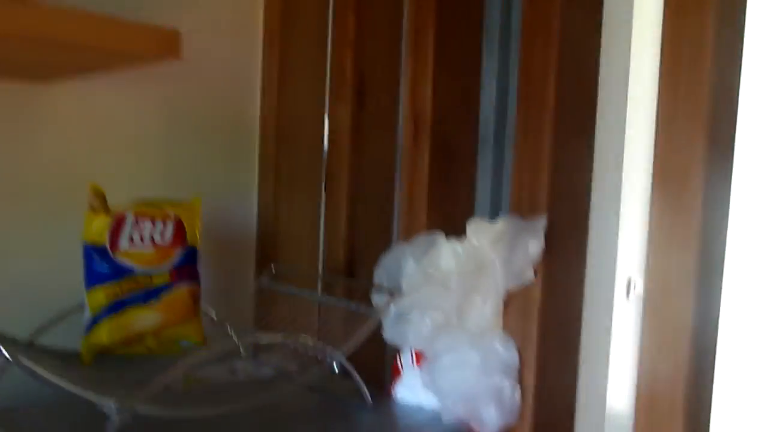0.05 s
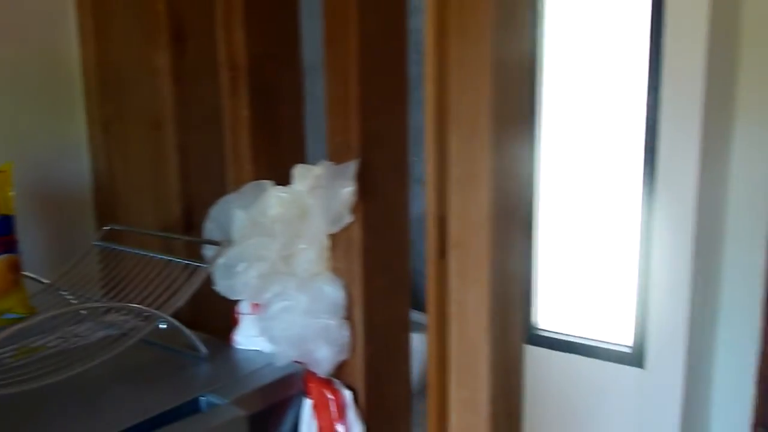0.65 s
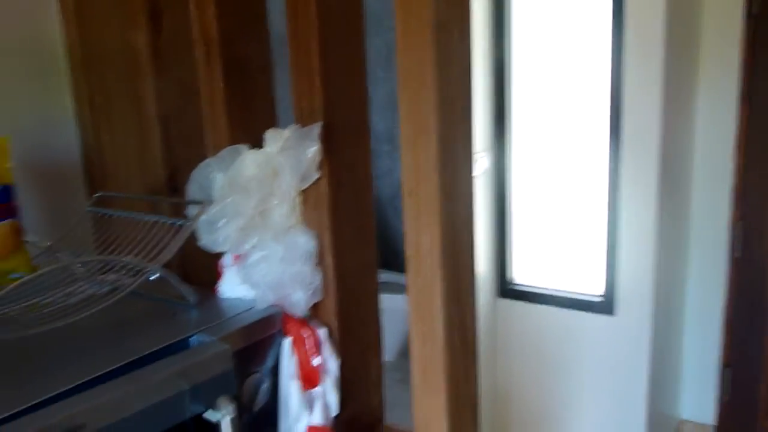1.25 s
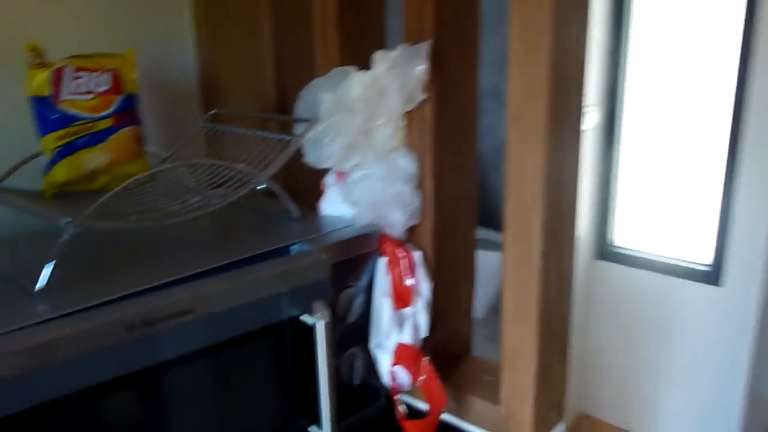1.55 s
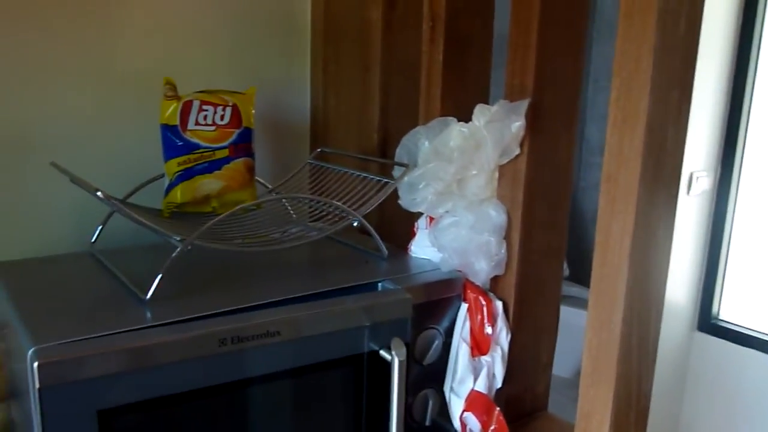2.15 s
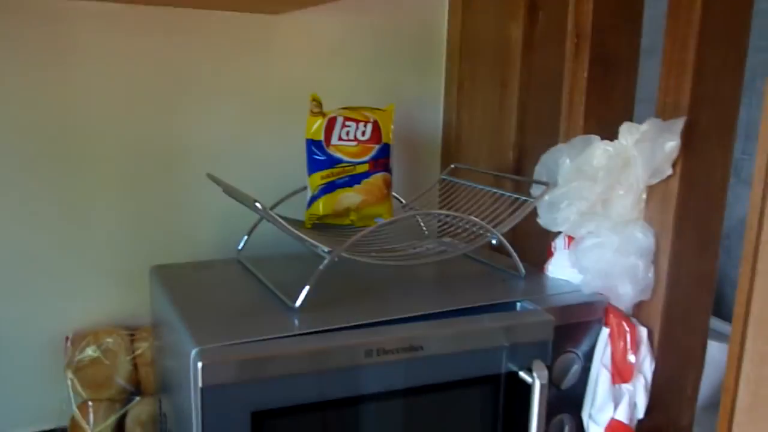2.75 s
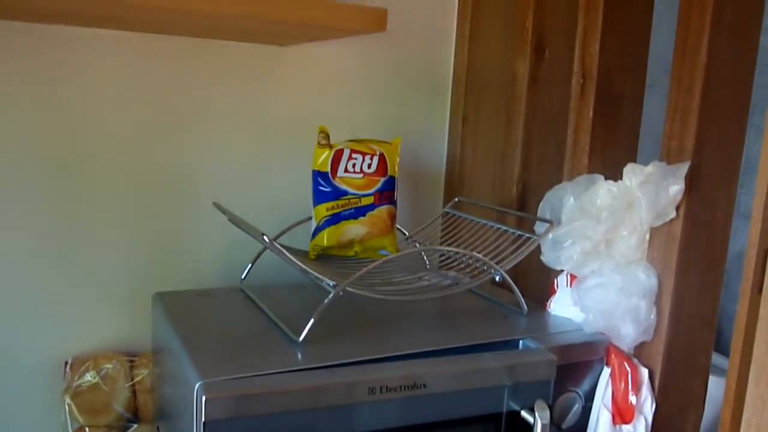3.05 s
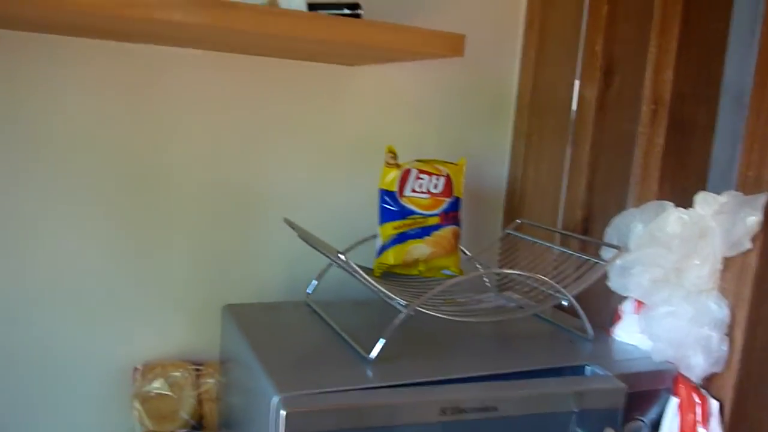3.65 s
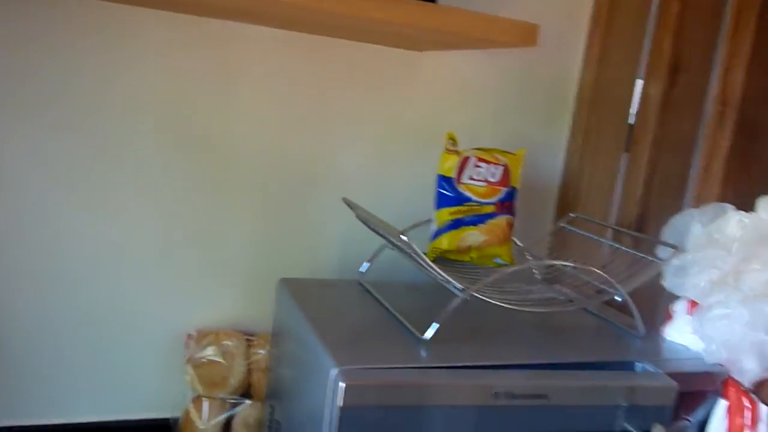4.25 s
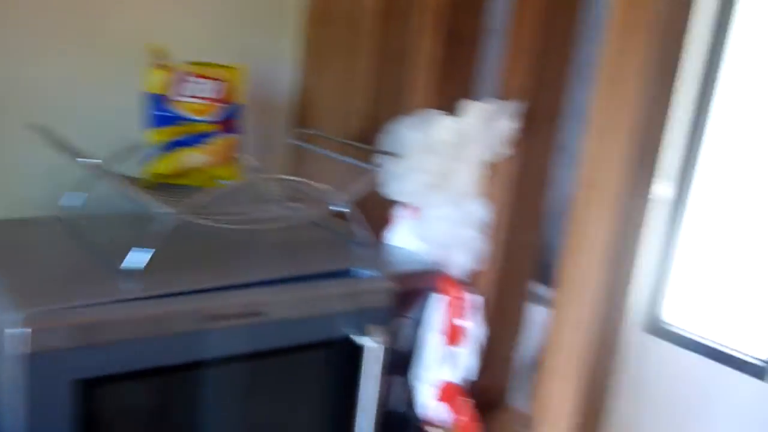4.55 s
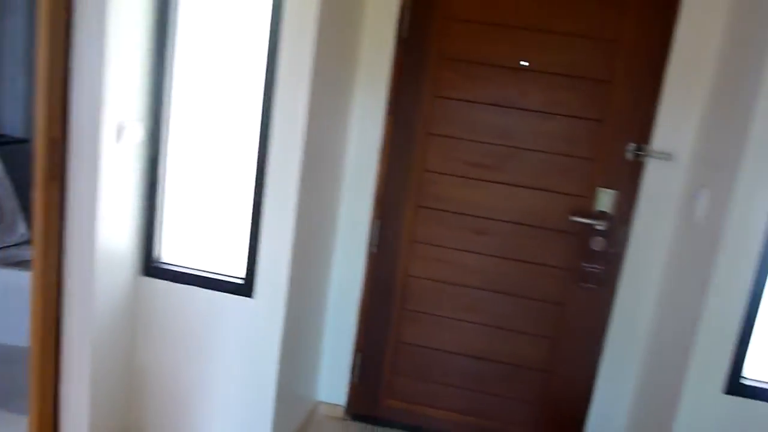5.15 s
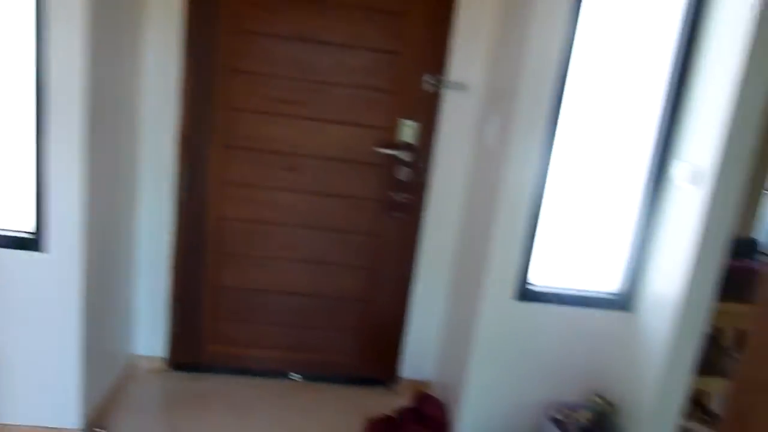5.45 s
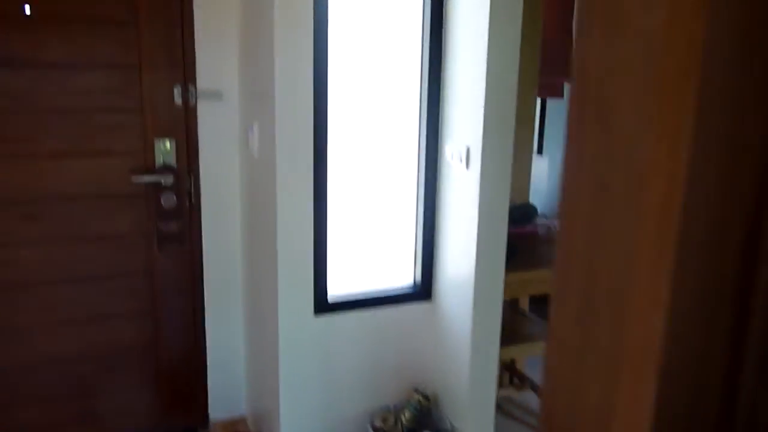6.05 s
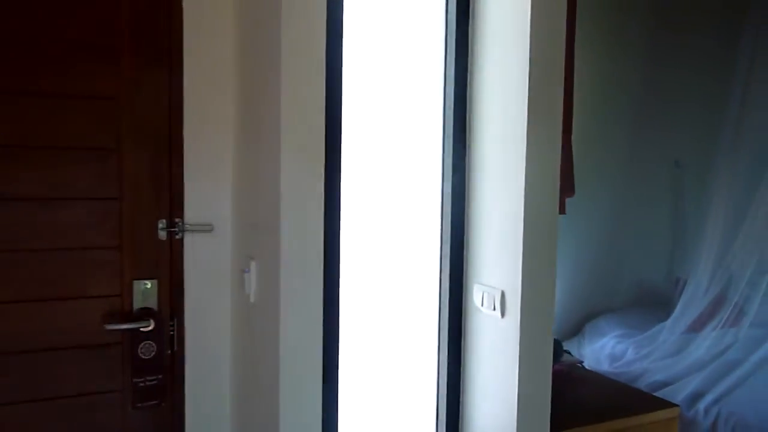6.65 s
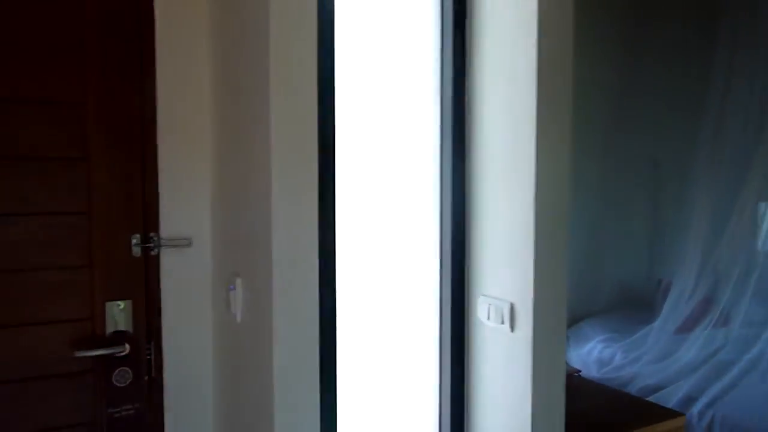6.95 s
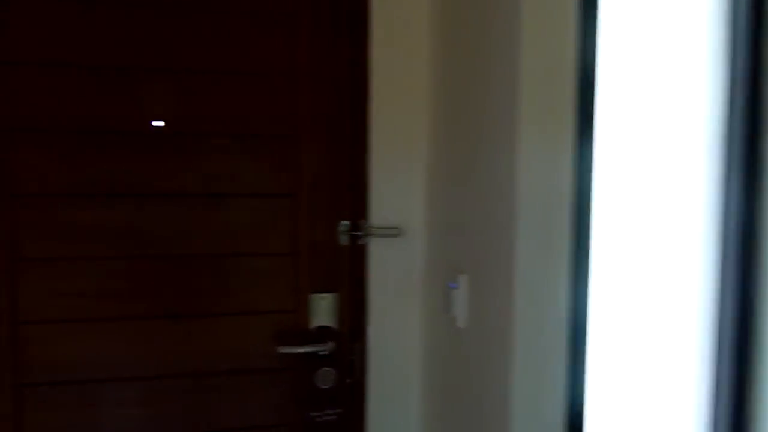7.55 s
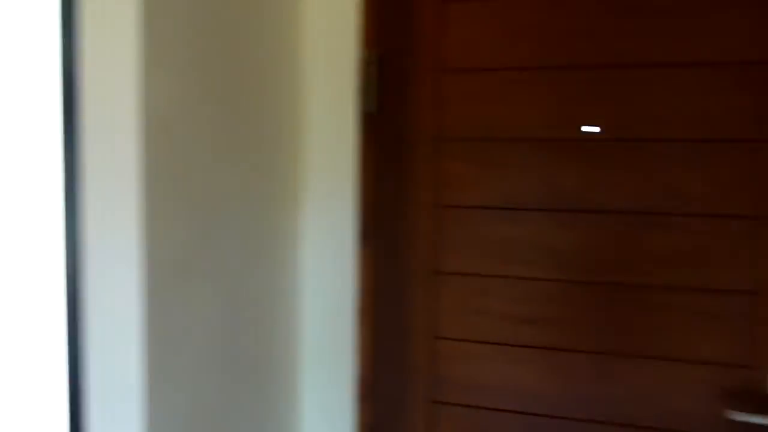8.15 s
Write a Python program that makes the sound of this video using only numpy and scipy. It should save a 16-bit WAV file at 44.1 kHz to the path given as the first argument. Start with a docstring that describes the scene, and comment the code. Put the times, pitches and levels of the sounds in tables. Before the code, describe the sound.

In a small room, a sliding door bangs shut and rattles, then come soft steps, one sharp click, shoe scuffs and clothing rustle.

```python
"""In a small hard room, a sliding door rumbles along its track, slams, booms, rattles and is knocked
into place. Soft footfalls and a sharp, ringing snap follow. Clothes rustle and soles scuff the floor
as a handheld camera is carried round, its casing ticking under the fingers.
A bird chirps faintly outside, heard mostly as an echo off the walls."""
import sys
import numpy as np
from scipy import signal
from scipy.fft import rfft, irfft, next_fast_len
from scipy.io import wavfile

SR = 44100
rng = np.random.default_rng(int(sys.argv[2]) if len(sys.argv) > 2 else 0)


def inscribe(sig):
    """Save sig as 16-bit PCM at rate SR to the path in sys.argv[1].

    A 1-D sig is mono; a 2-D sig holds one channel per row.
    Samples are clipped to [-1, 1] before scaling.
    """
    pcm = np.round(np.clip(np.atleast_2d(sig).T, -1, 1) * 32767)
    wavfile.write(sys.argv[1], SR, pcm.astype(np.int16))


N = 366382
T = np.arange(N) / SR
HIT_T = T[:32768]  # the time axis of one hit [s]


def door():
    """The door rolls shut, slams and booms, and its latch catches."""
    return slam() + latch() + rollers() + panel()


def slam():
    """Blows make the door ring and the room boom, and shake the loose frame."""
    # blows on the door (time [s], level [dB], treble [dB], bass [dB], room echo [dB])
    blows = [(.66, -37.5, -4, 6, -3.5), (.6775, -15, -6.5, -1.5, -5.5), (.686, -23.5, 8, -2, -9),
             (.699, -13, -1, -5, -19), (.711, -13, 5, -3.5, -1), (.727, -21, 3.5, -5.5, -2),
             (1.023, -19, -2, -6.5, -3), (1.099, -39, -2, 15, -27), (1.48, -42.5, 0, 5, -5),
             (1.543, -34, 10, 1, -1.5), (1.651, -29, -10, -7, -1)]
    # tone of a blow (frequency [Hz], level [dB])
    tone = [(25, -14), (70, 9), (135, -10.5), (220, 3), (430, 1), (750, -4.5), (1150, -7.5), (1500, -8),
            (2200, -22), (3600, -24), (8000, -27.5), (14000, -32)]
    # notes the door and the room ring with, the deepest being the room's boom
    # (frequency [Hz], level [dB], fade time [s])
    notes = [(70.6, -4.5, 1), (141.8, -2.5, 0.52), (199.8, 0.5, 0.35), (248.4, -1, 0.44), (280, 1, 0.49),
             (297.5, 10, 0.34), (362, -3.5, .4), (438, 2, 0.37), (488, -6.5, .4), (647, -1, 0.29),
             (771, 2, 0.27), (986, -7, 0.2), (1115, -8, 0.31), (1346, 1, .33), (1500, -12, .32),
             (1595, -15.5, .32)]
    return hits(blows + rattle(), tone, chatter_s=.088, push_db=-9,
                notes=notes, ring_db=-4, lag_s=.005, share=.21)


def rattle(start_s=.745, gap_s=.024, first_db=-25.5, fall_db_per_s=47, scatter_db=3):
    """Rows for hits(): the loose frame taps unevenly after the slam, growing weaker."""
    # tone of every tap (treble [dB], bass [dB], room echo [dB])
    tone = (-7.5, -7.5, -3.5)
    timing, strength = rng.standard_normal((10, 2)).T
    after_s = gap_s * (np.arange(10) + .25 * timing)
    levels = first_db - fall_db_per_s * after_s + scatter_db * strength
    return [(start_s + s, db, *tone) for s, db in zip(after_s, levels)]


def panel(boom_hz=116.1, build_s=.044, free_fade_s=1.3, stopped_fade_s=.31):
    """The door panel's lowest note builds after each shove and dies slowly, or fast once stopped."""
    # shoves on the panel (time [s], time until the frame stops it [s], level [dB])
    shoves = [(0.0, 0.23, -37.5), (.3, 0.38, -45.5), (.668, 0.022, -17), (.75, .37, -17.5),
              (1.545, 0.23, -37.5)]
    swings = []
    for s, free_s, db in shoves:
        age = np.maximum(T - s, 0)
        decay = age / free_fade_s + np.maximum(age - free_s, 0) / stopped_fade_s
        swings.append(undb(db) * (1 - np.exp(-age / build_s)) * np.exp(-np.log(1000) * decay))
    pitch = boom_hz + .55 * wander(7.2)
    return np.sqrt(2) * np.sin(2 * np.pi * np.cumsum(pitch) / SR) * together(swings)


def latch():
    """The latch knocks against its metal catch."""
    # knocks (time [s], level [dB], treble [dB], bass [dB], room echo [dB])
    knocks = [(1.544, -32, -15, 6, 4.5), (1.652, -21.5, -3.5, 9, -7), (1.661, -27, 15, -8, -4),
              (1.68, -24.5, -6, 1, -6), (1.733, -29.5, -21, 7, -12.5)]
    # tone of a knock (frequency [Hz], level [dB])
    tone = [(30, -16.5), (68, -4), (140, -12.5), (240, 1.5), (420, 2.5), (750, -3), (1200, -17.5),
            (2200, -11.5), (3400, -8.5), (5200, -20), (8500, -25.5), (11300, -17), (14500, -30)]
    return hits(knocks, tone, chatter_s=.12, push_db=-14, lag_s=.0049, share=.36)


def rollers(level_db=-41.5, stop_s=.75, jolt_rise_s=.0046, fade_s=.55):
    """An even rumble jumps at each joint of the track and fades when the door meets the frame."""
    # jolts at the joints (time [s], level [dB])
    joints = [(.1, -38.5), (.203, -35), (.29, -49), (.425, -41.5)]
    # tone of the rumble (frequency [Hz], level [dB])
    tone = [(40, -17.5), (110, -8.5), (200, -13), (370, -2), (550, -6), (850, -12), (1400, -24),
            (2500, -35), (6000, -44.5)]
    travel = undb(level_db) * np.exp(-np.log(1000) * np.maximum(T - stop_s, 0) / fade_s)
    jolts = [undb(db) * swell(s, jolt_rise_s, fade_s) for s, db in joints]
    return grainy_noise(tone, grain_db=2, grain_hz=90) * together([travel] + jolts)


def snap():
    """A part slips, catches and bounces back, ringing a little to the left."""
    # slip, catch and bounce (time [s], level [dB], treble [dB], bass [dB], room echo [dB])
    clicks = [(4.0747, -22.5, 17, -13, -11), (4.0765, -19, -6, -5.5, 2.5), (4.0797, -23.5, 11, 1, 0)]
    # tone of a click (frequency [Hz], level [dB])
    tone = [(50, -18), (170, -22), (380, 0.5), (490, -8.5), (1000, 0), (1450, -0.5), (2200, -1.5),
            (3600, 0.5), (6200, 1), (8500, -1), (11500, -3.5), (13500, 3), (15500, -5.5)]
    # notes the part rings with (frequency [Hz], level [dB], fade time [s])
    notes = [(385, -8, 0.72), (1018, -5, 0.44), (1390, 5, .55), (3480, -3.5, 0.33), (3480, -5, 0.28),
             (4258, 5.5, 0.46), (5760, -7, 0.38), (6374, -5, .3)]
    return hits(clicks, tone, chatter_s=.051, push_db=-6,
                notes=notes, ring_db=-9, left_db=7, lag_s=.0033, share=.33)


def footfalls():
    """Feet land on the floor with dull thuds."""
    # steps (time [s], level [dB], treble [dB], bass [dB], room echo [dB])
    steps = [(1.93, -56, -6, 8, 5.5), (2.284, -45.5, -2.5, -4, 1), (2.298, -43.5, -3.5, 2.5, -0.5),
             (2.376, -43.5, 2, -2, 2.5), (2.44, -52.5, -6, 0, 2), (2.52, -51, -3, -1.5, -6),
             (3.229, -46.5, -0.5, -1, 0.5), (3.29, -51, -2, 8, -4), (3.45, -58, 2.5, 4.5, 12.5),
             (3.53, -63, 1.5, -1.5, 3), (4.08, -49.5, 2, 12, 6), (7.08, -61, -2, 6, -2),
             (8.275, -52, 0, -4, 2)]
    # tone of a step (frequency [Hz], level [dB])
    tone = [(25, -11), (48, -5), (68, 5.5), (125, 3), (200, -3.5), (300, -0.5), (430, 0.5), (700, -15),
            (1500, -23), (3000, -38.5), (14000, -47)]
    return hits(steps, tone, chatter_s=.097, push_db=-8)


def scuffs(hollow_db=7, hollow_width=.23, lead_s=.15):
    """Soles scrape the floor: each grainy scuff swells and fades with its own hollow note."""
    # scuffs (peak time [s], level [dB], rise time [s], fade time [s], hollow note [Hz])
    scrapes = [(3.49, -52, 0.013, 0.34, 1200), (3.959, -53, .002, 0.24, 420),
               (4.015, -50.5, 0.0083, 0.9, 1304), (4.69, -40, 0.021, 0.28, 1050),
               (5.42, -50, 0.027, 0.2, 1050), (5.54, -46.5, 0.017, 0.35, 282),
               (5.63, -48.5, 0.028, 0.16, 646), (5.98, -36, 0.0016, 0.21, 840),
               (6.202, -43, 0.0075, 0.13, 400), (6.253, -35.5, 0.0023, 0.33, 1120),
               (6.42, -52, 0.09, 0.85, 795), (6.68, -51.5, 0.0059, 0.23, 454),
               (6.78, -46, 0.022, 0.59, 1250), (7.075, -44, 0.013, 0.19, 640),
               (7.15, -45.5, .025, 0.12, 890)]
    # tone of a scuff (frequency [Hz], level [dB])
    tone = [(50, -24), (150, -12.5), (400, 0.5), (600, -1.5), (1050, -2.5), (1600, -6.5), (2300, -16),
            (4000, -16.5), (8000, -21), (14000, -26)]
    out, hz = np.zeros((2, N)), frequencies(len(HIT_T))
    for s, db, rise_s, fade_s, hollow_hz in scrapes:
        slips = stereo_noise(len(HIT_T)) * undb(2.6 * wander(351.7)[:len(HIT_T)])
        hollow = hollow_db / (1 + (np.log((hz + 1) / hollow_hz) / hollow_width) ** 2)
        grip = np.exp(np.minimum((HIT_T - lead_s) / rise_s, np.log(1000) * (lead_s - HIT_T) / fade_s))
        sole = colour(slips, read_curve(tone, hz) + hollow)
        sole = reflect(sole, lag_s=rng.uniform(.00401, .009), share=1)
        add(out, s - lead_s, undb(db) * grip * unit(sole))
    return out


def clothes(fade_s=.66):
    """Cloth slides on cloth as arms and legs move: a bright swish over a grainier rub."""
    # strokes of cloth (peak time [s], rise time [s], swish level [dB], rub level [dB])
    strokes = [(.27, .17, -54.5, -58), (.365, 0.047, -43.5, -55.5), (.56, 0.044, -38.5, -50),
               (.88, 0.067, -43.5, -55), (1.37, 0.097, -41.5, -53), (1.478, 0.068, -36.5, -53),
               (1.61, 0.069, -52.5, -40.5), (4.68, 0.041, -50, -46.5), (4.72, 0.3, -54.5, -77),
               (4.919, 0.065, -45, -53), (5.05, .04, -71, -54.5), (5.15, 0.035, -48.5, -52.5),
               (5.33, 0.033, -55, -65), (5.46, 0.054, -48.5, -53.5), (5.66, 0.13, -53.5, -54.5),
               (5.85, 0.057, -50, -48.5), (5.94, 0.064, -46.5, -50.5), (6.1, 0.12, -53.5, -55),
               (6.27, 0.057, -55, -45.5), (6.38, 0.11, -48, -60), (6.53, 0.14, -52.5, -59),
               (6.75, 0.039, -46, -50.5), (6.82, 0.047, -47.5, -49.5), (6.95, 0.058, -47.5, -49),
               (7.08, 0.063, -51.5, -51), (7.33, 0.16, -53.5, -58), (7.52, 0.077, -58, -60.5),
               (7.72, 0.12, -61.5, -60.5), (7.819, 0.049, -52.5, -59), (8.02, 0.026, -62, -61),
               (8.1, 0.035, -52, -67), (8.26, 0.078, -60, -58)]
    # tone of the swish (frequency [Hz], level [dB])
    swish_tone = [(500, -22), (2000, -1.5), (3400, -1.5), (6000, 0.5), (8500, -2.5), (10500, -1.5),
                  (13500, -6), (15500, -12.5)]
    # tone of the rub (frequency [Hz], level [dB])
    rub_tone = [(50, -19), (130, -5), (300, 1), (700, 0.5), (1100, 1.5), (1500, 2), (2200, -9.5),
                (3500, -34.5), (8000, -32.5)]
    speeds = [(swell(s, rise_s, fade_s), swish_db, rub_db) for s, rise_s, swish_db, rub_db in strokes]
    swish = together(undb(db) * speed for speed, db, _ in speeds)
    rub = together(undb(db) * speed for speed, _, db in speeds)
    return (swish * grainy_noise(swish_tone, grain_db=1, grain_hz=550)
            + rub * grainy_noise(rub_tone, grain_db=2, grain_hz=150))


def casing():
    """The camera's casing ticks and rings briefly under the fingers."""
    # ticks (time [s], level [dB], treble [dB], bass [dB], room echo [dB])
    ticks = [(2.699, -47, -3, -4, -5), (2.739, -47.5, -8, 0, -14), (2.753, -51, -14, -4, -4),
             (2.783, -45, -8, -11, -14.5), (2.851, -65.5, 5, 0, -10), (8.138, -46, 5, -5, 0),
             (8.18, -50.5, -5, 10, -15), (8.192, -53, -18, 6, -15), (8.222, -45.5, -4, 2, -1.5),
             (8.236, -51, -19, 4, -8), (8.289, -46.5, -19, 11, -10)]
    # tone of a tick (frequency [Hz], level [dB])
    tone = [(60, -11), (180, -25), (420, 1.5), (600, -4), (850, -2), (1200, -7), (2000, -9), (3600, -11.5),
            (5500, -18), (7200, -12), (8800, -17), (10800, -13.5), (15000, -29)]
    # notes the casing rings with (frequency [Hz], level [dB], fade time [s])
    notes = [(577, -0.5, 0.12), (1227, -3.5, 0.099), (2010, -8, 0.073), (3910, -0.5, .03),
             (7240, -3, 0.042), (10300, -1.5, .025), (11100, 1.5, .025)]
    return hits(ticks, tone, chatter_s=.04, push_db=-4, notes=notes, ring_db=-4, lag_s=.0018, share=.1)


def bird(direct=.62, quaver_hz=150):
    """Thin falling whistles arrive mostly by way of the walls."""
    # chirps (time [s], start pitch [Hz], end pitch [Hz], length [s], relative level [dB])
    chirps = [(.19, 6600, 3190, .09, -56), (2.39, 6400, 4870, .06, -62.5),
              (2.955, 6500, 5060, 0.054, -64.5), (3.47, 6500, 5220, 0.057, -67),
              (3.957, 6500, 5250, 0.036, -60), (4.509, 6400, 5000, 0.023, -59),
              (5.678, 6800, 5400, 0.058, -61.5), (7.665, 7300, 5800, 0.054, -60.5)]
    out, walls = np.zeros((2, N)), room_echo()
    walls[:, 0] += direct
    for s, start_hz, end_hz, length_s, db in chirps:
        progress = np.linspace(0, 1, int(length_s * SR))
        pitch = start_hz + (end_hz - start_hz) * progress + quaver_hz * wander(500)[:len(progress)]
        whistle = np.sin(np.pi * progress) * np.sin(2 * np.pi * np.cumsum(pitch) / SR)
        add(out, s, 2 * undb(db) * signal.fftconvolve(whistle[None], walls, axes=1))
    return out


def room_echo(build_s=.011):
    """The echo off the walls builds quickly, and the bass lingers longest."""
    # how long the echo lasts (frequency [Hz], fade time [s])
    fade_times = [(60, 0.93), (250, 0.57), (1000, 0.52), (4000, 0.55), (8000, 0.53), (14000, 0.38)]
    noise, hz = rfft(stereo_noise(len(HIT_T))), frequencies(len(HIT_T))
    centres, fades = np.transpose(fade_times)
    bands = [read_curve(np.c_[centres, row], hz) for row in np.eye(len(centres))]
    tail = sum(irfft(noise * band) * fade(fade_s) for band, fade_s in zip(bands, fades))
    return unit_energy(tail * (1 - np.exp(-HIT_T / build_s)))


def room_hush(level_db=-60.5):
    """The quiet room makes a faint, wavering noise."""
    # tone of the hush (frequency [Hz], level [dB])
    tone = [(25, -3), (65, -2.5), (110, -6), (180, 0), (380, 0.5), (700, -4), (1400, -9.5), (2200, -16.5),
            (3500, -12), (5200, -15.5), (8000, -19), (14000, -23.5)]
    return grainy_noise(tone, grain_db=1.3, grain_hz=13) * undb(level_db)


def hits(rows, tone, chatter_s, push_db, notes=None, ring_db=0, left_db=0, lag_s=.00397, share=.16):
    """Each hit is one push, a short chatter of touching parts, echoes and any ringing notes."""
    out, hz, walls = np.zeros((2, N)), frequencies(len(HIT_T)), room_echo()
    treble = hz ** 4 / (hz ** 4 + 2000 ** 4)
    bass = 1 / (1 + (hz / 180) ** 2)
    tone_db = read_curve(tone, hz)
    ringing = undb(ring_db) * ring(notes) if notes else 0
    for s, db, treble_db, bass_db, room_db in rows:
        contact = unit_energy(stereo_noise(len(HIT_T)) * fade(chatter_s))
        contact[:, 0] += undb(push_db)
        contact = unit_energy(contact) * undb([[left_db / 2], [-left_db / 2]])
        hit = colour(contact + undb(room_db) * walls, tone_db + treble_db * treble + bass_db * bass)
        hit = unit_energy(reflect(hit, lag_s, share)) * np.hypot(1, undb(room_db)) + ringing
        add(out, s, hit * undb(db) * np.sqrt(.012 * SR))  # the level is that of the first few ms
    return out


def ring(notes):
    """Fading notes set off by a hit, each with a slightly random strength."""
    sizes = undb(2 * rng.standard_normal(len(notes)))
    return unit_energy(sum(size * undb(db) * np.sin(2 * np.pi * hz * HIT_T) * fade(fade_s)
                           for (hz, db, fade_s), size in zip(notes, sizes)))


def reflect(x, lag_s, share):
    """A nearby surface sends back a share of the sound a moment later."""
    lag = int(lag_s * SR)
    return (x + share * np.pad(x, ((0, 0), (lag, 0)))[:, :-lag]) / np.hypot(1, share)


def grainy_noise(tone, grain_db, grain_hz):
    """Noise whose strength flickers, like the many tiny slips of rubbing surfaces."""
    size = next_fast_len(N, True)
    slips = stereo_noise(size)[:, :N] * undb(grain_db * wander(grain_hz))
    slips = np.pad(slips, ((0, 0), (0, size - N)))
    return unit(colour(slips, read_curve(tone, frequencies(size)))[:, :N])


def stereo_noise(size):
    """Noise from all sides: left and right are alike in the bass and differ in the treble."""
    # stereo width (frequency [Hz], level of the differing part over the common part [dB])
    width = [(60, -17), (350, -20.5), (700, -15), (1300, -11), (2200, -3), (6500, -2), (9500, 0.5),
             (13000, 2.5)]
    common, differing = rfft(rng.standard_normal((2, size)))
    differing = differing * undb(read_curve(width, frequencies(size)))
    return unit(irfft(np.array([common + differing, common - differing]), size))


def colour(x, db):
    """Give x a tone, with one level per frequency; white noise keeps its power."""
    size = x.shape[-1]
    cepstrum = irfft(np.log(unit(undb(db))), size)
    # fold the filter forward in time, so it rings after a hit and not before
    cepstrum[1:size // 2] *= 2
    cepstrum[size // 2 + 1:] = 0
    return irfft(rfft(x) * np.exp(rfft(cepstrum)), size)


def swell(s, rise_s, fade_s):
    """A bell-shaped swell that peaks at time s and dies no faster than fade_s allows."""
    age = T - s
    tail = np.where(age > 0, np.log(1000) * age / fade_s, np.inf)
    return np.exp(-np.minimum((age / rise_s) ** 2, tail).clip(0, 30))


def fade(fade_s):
    """Die away by 60 dB in each fade time."""
    return np.exp(-np.log(1000) * HIT_T / fade_s)


def wander(rate_hz):
    """A smooth random drift with a spread near 1."""
    steps = rng.standard_normal(int(T[-1] * rate_hz) + 2)
    return np.interp(T * rate_hz, np.arange(len(steps)), steps)


def together(gains):
    """Unrelated sounds add in power."""
    return np.sqrt(sum(gain ** 2 for gain in gains))


def add(out, s, x):
    """Mix x into out from time s."""
    start = max(int(s * SR), 0)
    out[:, start:start + x.shape[-1]] += x[..., :N - start]


def read_curve(points, hz):
    """Read between (frequency, value) points, with octaves evenly spaced."""
    point_hz, value = np.transpose(points)
    return np.interp(np.log(hz + 1), np.log(point_hz), value)


def frequencies(size):
    """The frequencies in a spectrum of this many samples."""
    return np.arange(size // 2 + 1) * SR / size


def undb(db):
    """Turn decibels into a multiplier."""
    return 10 ** (np.asarray(db) / 20)


def unit(x):
    """Scale to an average power of 1."""
    return x / np.sqrt(np.mean(x ** 2))


def unit_energy(x):
    """Scale to an energy of 1 per channel."""
    return unit(x) / np.sqrt(x.shape[-1])


def scene():
    """All the sources over the hush of the room."""
    return door() + snap() + footfalls() + scuffs() + clothes() + casing() + bird() + room_hush()


def record(dry, low_cut_hz=24, top_hz=15700):
    """The camera's two sides hear unequally; it cuts rumble, three thin bands, peaks and top treble."""
    # how much more the left side hears than the right (frequency [Hz], level [dB])
    balance = [(60, -1.3), (300, -1.1), (1000, 0), (3500, 1), (14000, 0)]
    # thin bands that are cut out (frequency [Hz], width [Hz])
    notches = [(2610, 420), (4610, 544), (7930, 380)]
    size = next_fast_len(N, True)
    left_db = read_curve(balance, frequencies(size))
    sound = irfft(rfft(dry, size) * undb([left_db / 2, -left_db / 2]), size)[:, :N]
    sound = signal.sosfilt(signal.butter(2, low_cut_hz, "highpass", fs=SR, output="sos"), sound)
    for hz, width_hz in notches:
        edges = [hz - width_hz / 2, hz + width_hz / 2]
        sound = signal.sosfilt(signal.butter(2, edges, "bandstop", fs=SR, output="sos"), sound)
    sound = np.clip(sound, -.95, .95)
    return signal.sosfilt(signal.ellip(10, .2, 80, top_hz, fs=SR, output="sos"), sound)


dry = scene()
out = record(dry)
inscribe(out)
```